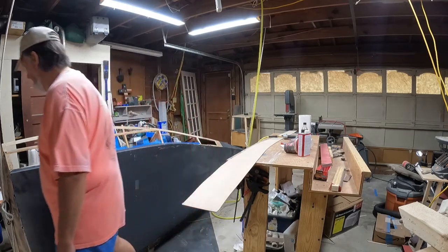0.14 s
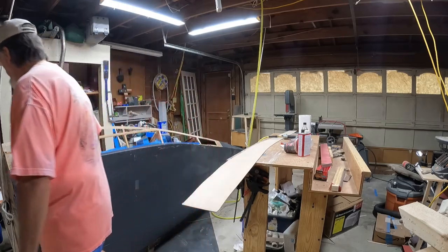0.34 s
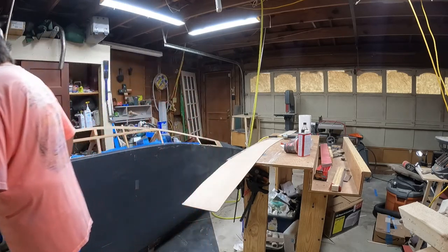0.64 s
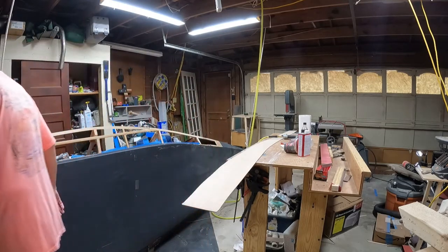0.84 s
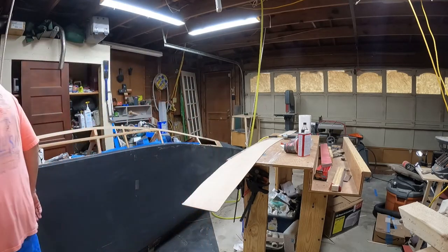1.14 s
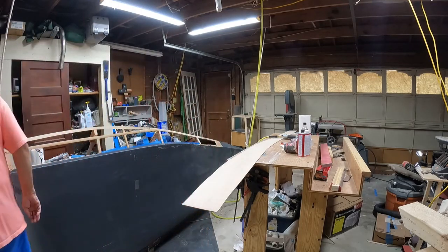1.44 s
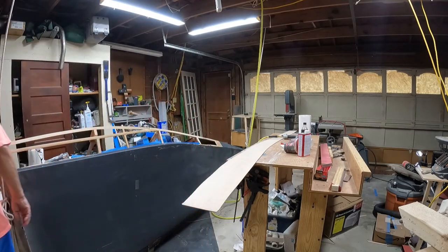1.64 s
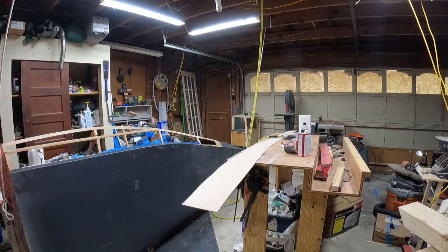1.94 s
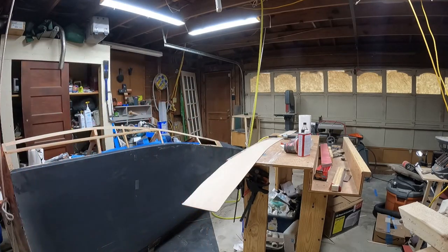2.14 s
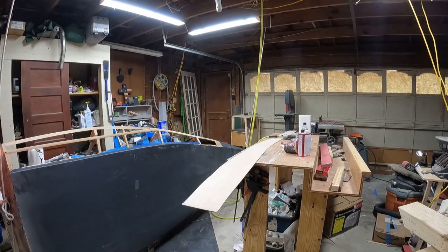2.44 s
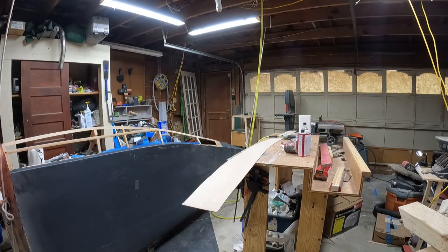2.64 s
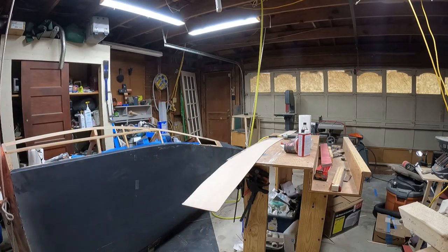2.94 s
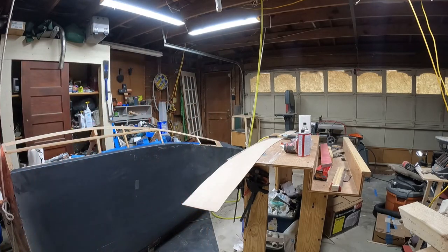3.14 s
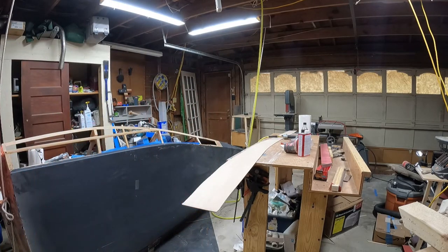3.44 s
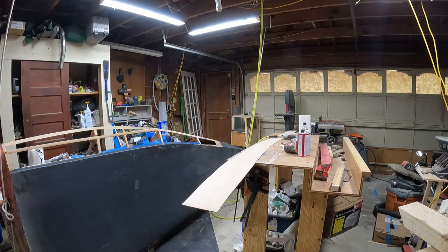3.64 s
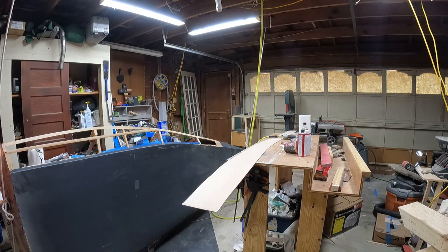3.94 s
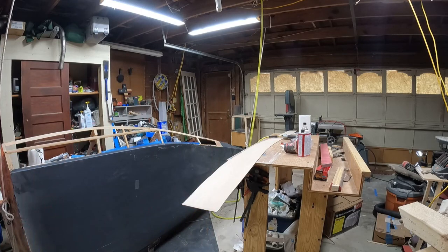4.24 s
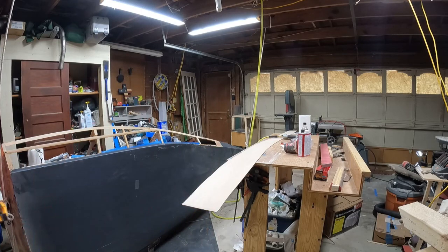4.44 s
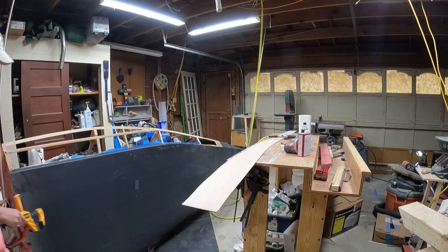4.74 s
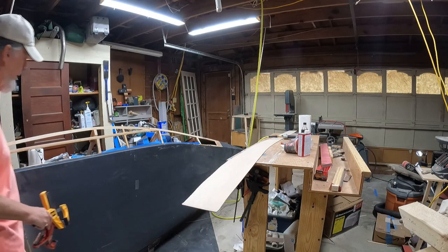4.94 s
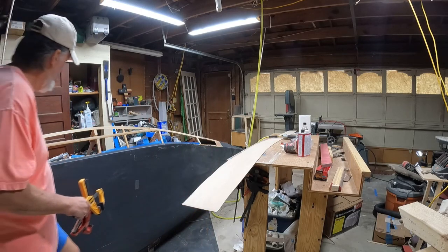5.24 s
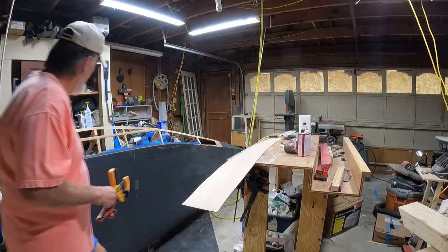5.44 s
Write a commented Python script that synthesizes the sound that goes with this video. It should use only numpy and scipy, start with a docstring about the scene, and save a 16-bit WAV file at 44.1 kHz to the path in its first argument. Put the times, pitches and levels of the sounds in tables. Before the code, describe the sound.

Someone shuffles about off to the side, shoes gritting on concrete above a low wavering hum and rumble. Around the middle, a drawer rolls out in short dull judders and bangs at its stop, tools rattling and ringing briefly. After quieter scuffing it is pushed back, thumps and clicks closed with a tiny high ping. More faint scuffs end the scene. Stereo pickup in a room with about half a second of ring.

```python
"""A garage workshop where a machine hums low in beating tones over rumble and faint air hiss.
Gritty grains under swelling strokes make soles shuffle over the concrete floor. Juddering strokes roll
a drawer open; at its stop, blows of chattering noise set the tools in it ringing. The drawer rolls shut,
its catch pings, and the shuffling returns. Small ticks, rattles and bumps are struck resonances.
Filtered noise tails give the cluttered room its ring of about half a second."""
import sys
import numpy as np
from scipy import signal
from scipy.fft import rfft, irfft
from scipy.io import wavfile
from scipy.ndimage import uniform_filter1d

SR = 44100
rng = np.random.default_rng(int(sys.argv[2]) if len(sys.argv) > 2 else 0)


def generate_wav(sig):
    """Save sig (samples, or channels by samples) to the path in sys.argv[1] as 16-bit PCM at SR."""
    pcm = np.round(np.clip(np.atleast_2d(sig).T, -1, 1) * 32767).astype(np.int16)
    wavfile.write(sys.argv[1], SR, pcm)


N = 246556
T = np.arange(N) / SR


def clatter(crack_db=-14.5, ring_db=-33, crack_t60=0.067, direct_db=-5, rise_s=0.00084, jostle_hz=4):
    """The drawer stops and its tools pile into each other: each blow chatters and feeds their ringing."""
    # tools hitting the drawer and each other: t/s, relative level/dB, dull above f/Hz
    blows = [(3.010, -2, 6940), (3.022, 3, 6000), (3.030, -0.5, 5980), (3.046, -1.5, 6000),
             (3.055, 3, 6970), (3.073, -1.5, 3000), (3.087, -9.5, 2210), (3.101, 6.5, 1640),
             (3.115, -1, 1298), (3.237, -18.5, 1200)]
    # what the loaded drawer rings with: f/Hz, relative level/dB, t60/s
    tool_modes = [(872, -6, .42), (1005, -4, .36), (1055, -7, .42), (1109, -5, .38), (1262, -4, .31),
                  (1296, -3, .36), (1412, -1, .38), (1541, -6, .4), (1828, -1, .36), (1866, -6, .3),
                  (1948, -2, .3), (2124, -6, .26), (2225, -4, .22), (2384, -3, .3), (2509, -2, .25),
                  (2900, -7, .26)]
    # colour of the contact noise: f/Hz, relative level per Hz/dB
    crack_colour = [(30, -48.5), (95, -12.5), (280, -9.5), (520, -9.5), (760, -7), (1050, 1), (1700, -0.5),
                    (2600, -0.5), (3800, -4), (5500, -9), (7500, -10.5), (9500, -21.5), (12000, -24),
                    (15000, -33.5)]

    cracks, rings = np.zeros(N), np.zeros((2, N))
    for s, db, dull_hz in blows:
        soft = signal.butter(1, min(dull_hz, 0.45 * SR), fs=SR)
        rise = 1 - np.exp(-T[:SR] / rise_s)
        chatter = grains(5000, 2.7)[:SR] * fade(crack_t60) * rise
        add(cracks, s, undb(db + crack_db) * signal.lfilter(*soft, chatter))

    for hz, db, t60 in tool_modes:
        # blows at unrelated phases add up in energy; dull ones feed the high modes less
        energy = np.zeros(N)
        for s, blow_db, dull_hz in blows:
            dulling = 1 + (hz / dull_hz) ** 2
            add(energy, s, (undb(blow_db) * fade(t60)) ** 2 / dulling)
        swing = undb(db + ring_db) * uniform_filter1d(np.sqrt(energy), size=130)
        # the jostling tools detune it slightly, and it reaches each microphone in its own phase
        phase = 2 * np.pi * np.cumsum(hz + jostle_hz * walk(60)) / SR
        mid = np.sin(phase)
        side = rng.choice([-1, 1]) * 0.7 * np.cos(phase)
        rings += swing * np.array([mid, side])

    cracks = colour(cracks, crack_colour)
    return room(cracks * undb(direct_db), cracks) + stereo(*rings)


def drawer(runner_db=-4, harden=0.7, wet_db=-1):
    """Rollers judder along their track and shake the box; harder pushes bring up the runners' rattle."""
    # pulls and pushes: start t/s, time to the peak/s, peak drive level/dB, swell from start to peak/dB
    pushes = [(2.655, 0.014, -49, 2), (2.71, 0.063, -53.5, -0.5), (2.78, .06, -40.5, 7),
              (2.89, .06, -43.5, -5), (3.898, 0.033, -48.5, 4), (4.11, 0.05, -51.5, 13),
              (4.245, 0.022, -51, 11), (4.365, 0.05, -40, 5)]
    # colour of the drawer box: f/Hz, relative level per Hz/dB
    box_colour = [(30, -34), (60, -26), (95, 4.5), (160, 2), (230, -2.5), (330, -1), (430, -12.5),
                  (600, -29), (1200, -36.5), (3000, -58.5)]
    # colour of its runners: f/Hz, relative level per Hz/dB
    runner_colour = [(300, -4.5), (600, 2.5), (750, -17), (950, -1), (1300, -8.5), (2200, -10), (3100, -7),
                     (3800, -18), (7000, -24.5), (12000, -77.5)]

    push = strokes(pushes, release_db_per_s=350)
    box = colour(push * grains(1500, 1.4), box_colour)
    hard_push = push * (push / push.max()) ** harden
    runners = colour(hard_push * grains(1800, 1.2), runner_colour) * undb(runner_db)
    rolling = box + runners
    return room(0.72 * rolling, rolling * undb(wet_db))


def shuffles(wet_db=-7, grains_per_s=12000, spread_db=2, heavy_db=-8):
    """Soles grind over grit that crackles differently at each microphone; hard scuffs gain a lower band."""
    # soles dragging on the floor: start t/s, time to the peak/s, peak level/dB, swell from start to peak/dB
    scuffs = [(0.035, 0.012, -64.5, -12), (0.11, .05, -59.5, 10), (0.265, 0.066, -56.5, 14),
              (0.41, 0.038, -59.5, 13), (0.792, 0.035, -45, 6), (0.9, 0.054, -64, 5),
              (1.04, 0.025, -56, 11), (1.11, 0.082, -55, 17), (1.541, 0.021, -44, 6), (1.866, 0.15, -50, 6),
              (2.025, 0.04, -46.5, 9), (2.205, .078, -35, 14), (3.44, 0.055, -47.5, 4),
              (3.55, 0.038, -48, 10.5), (4.1, 0.081, -56.5, 9), (4.21, 0.058, -43, 12.5),
              (4.742, 0.028, -48.5, 1), (4.84, 0.05, -50.5, 16), (5.04, 0.03, -55, 9)]
    # faint gritty rustle of moving about between the scuffs: t/s, level/dB
    rustle = [(0, -64), (.6, -66), (.7, -73), (.8, -61), (1.0, -64.5), (1.36, -69), (1.5, -62), (1.72, -67),
              (1.85, -61), (2.17, -76), (2.5, -67), (2.68, -78.5), (3.85, -75.5), (4.05, -63),
              (4.42, -73.5), (4.7, -58), (5.2, -67), (5.59, -61)]
    # colour of the grit under a sole: f/Hz, relative level per Hz/dB
    grit_colour = [(300, -28), (600, -32.5), (820, -40.5), (1050, -0.5), (1400, 1), (2200, 0.5),
                   (4200, -0.5), (7000, -4.5), (9500, -14), (12000, -19.5), (15000, -26)]

    drag = strokes(scuffs, release_db_per_s=276) + envelope(rustle)
    mid, side = (colour(drag * grains(grains_per_s, spread_db), grit_colour) for _ in range(2))
    sole_band = signal.butter(2, [550, 1800], "band", fs=SR, output="sos")
    sole = unit(signal.sosfilt(sole_band, grains(grains_per_s, spread_db)))
    hard_drag = drag ** 2 / drag.max()
    mid = mid + sole * hard_drag * undb(heavy_db)
    return room(mid, mid * undb(wet_db)) + stereo(np.zeros(N), 0.75 * side)


def taps(catch_s=4.443, catch_db=-50.0, tick_db=16, rattle_db=-1.0, soft_hz=9000):
    """Small knocks: a sharp contact and brief noise through one broad resonance; the catch snaps and pings."""
    # sharp little contacts: t/s, relative level/dB, centre f/Hz
    ticks = [(0.044, -51, 4570), (.965, -53, 8750), (1.1826, -36, 1520), (1.1835, -39.5, 5100),
             (1.1858, -36.5, 1210), (1.775, -45.5, 2480), (1.798, -41.5, 2070), (1.865, -40, 3500),
             (3.439, -38, 3200), (3.666, -46.5, 3560), (4.097, -51.5, 4450), (4.443, -38, 5400),
             (5.268, -51.5, 4940), (5.566, -42.5, 2600)]
    # brief rattles and scrapes: t/s, relative level/dB, centre f/Hz
    rattles = [(.14, -51.5, 1560), (.313, -50, 1730), (.797, -45, 1930), (1.83, -53, 1970),
               (1.848, -47.5, 2120), (2.812, -53, 4500), (2.893, -47.5, 2800), (2.896, -38, 660),
               (3.112, -24.5, 600), (3.215, -31.5, 3730), (3.477, -39, 1920), (3.609, -46.5, 1380),
               (3.9, -61, 2506), (4.367, -47, 1900), (4.41, -41.5, 520), (4.885, -45.5, 2000)]
    # dull bumps of wood: t/s, relative level/dB, centre f/Hz
    bumps = [(1.186, -42.5, 368), (2.662, -49, 282), (2.852, -33.5, 320), (2.933, -28.5, 297),
             (3.925, -47.5, 324), (4.144, -47, 287), (4.372, -34, 93.8), (4.42, -43, 346)]
    # what each kind shares: width/octaves, t60/s, room send before its final doubling/dB
    tick_kind = (0.62, 0.018, -9)
    rattle_kind = (0.75, 0.056, -3)
    bump_kind = (0.47, 0.035, -5)
    # what the catch rings with: f/Hz, relative level/dB, t60/s
    catch_modes = [(5329, -2, .05), (5540, -1, .07), (5650, -2, .1), (5760, -2, .09), (5850, 0, .1),
                   (6020, -3, .08)]

    direct, send = np.zeros(N), np.zeros(N)
    hz = np.geomspace(30, 20000, 40)
    softness = 10 * np.log10(1 + (hz / soft_hz) ** 4)
    for rows, kind in ((ticks, tick_kind), (rattles, rattle_kind), (bumps, bump_kind)):
        octaves, t60, wet_db = kind
        for s, db, centre_hz in rows:
            offset = np.log2(hz / centre_hz) / octaves
            body = -40 * np.log10(1 + offset ** 2 / 2) - softness
            force = undb(rattle_db) * rng.standard_normal(SR) * fade(t60)
            force[0] = undb(tick_db)  # the sharp contact
            knock = undb(db) * colour(force, np.column_stack([hz, body]))
            add(direct, s, knock)
            add(send, s, knock * undb(wet_db))

    ping = undb(catch_db) * ring(catch_modes)
    add(direct, catch_s, ping)
    add(send, catch_s, ping / 2)
    return room(direct, 2 * send)


def machine(hum_hz=128.6, in_step_s=2.11, drift_hz=0.478, rumble_db=-52, boom_hz=77, boom_width_hz=12):
    """Two close tones beat over weaker wavering ones, a low rumble and a boom that swells and sinks back."""
    # main tone: t/s, level/dB
    hum = [(0.2, -35), (0.6, -48.1), (1.0, -43), (1.5, -52), (2.0, -43.5), (2.6, -55), (3.4, -45),
           (4.2, -40), (4.9, -43), (5.6, -39)]
    # a second tone a few Hz higher that beats against it: t/s, level/dB
    hum_partner = [(0.0, -51), (1.1, -46), (1.8, -56.5), (2.3, -50), (3.2, -53.5), (4.0, -64), (4.7, -43.5),
                   (5.6, -56)]
    # how far the second tone lies above the first: t/s, offset f/Hz
    beat = [(0.0, 5.63), (0.55, 2.68), (1.1, 3.82), (1.8, 4.02), (2.4, 2.74), (3.0, 3.62), (3.7, 2.17),
            (4.4, 3.9), (5.0, 2.9), (5.59, 4.07)]
    # weaker tones: f/Hz, level/dB, waver/dB (random in both directions)
    hum_lines = [(53.8, -55, 4), (76.7, -78.5, -8.5), (159.3, -62.5, -0.5)]
    # a deep boom under the hum: t/s, level/dB
    boom_level = [(3.6, -64.5), (3.95, -53), (4.15, -41.5), (4.42, -49.5), (4.6, -52), (5.59, -48)]
    # colour of the rumble: f/Hz, relative level per Hz/dB
    rumble_colour = [(20, -26), (35, 8), (55, 11), (90, 2.5), (150, -2.5), (220, -4), (400, -46)]

    def turn(hz):
        """Phase of a slightly drifting tone."""
        return 2 * np.pi * np.cumsum(hz + drift_hz * walk(3.84)) / SR

    def tone(hz):
        """Drifting sine of rms 1."""
        return np.sqrt(2) * np.sin(turn(hz))

    phase = turn(hum_hz)
    lead = 2 * np.pi * np.cumsum(np.interp(T, *np.transpose(beat))) / SR
    lead = lead - np.interp(in_step_s, T, lead)  # both tones are in step at this time
    first = envelope(hum) * np.sin(phase)
    second = envelope(hum_partner) * np.sin(phase + lead)
    main = np.sqrt(2) * (first + second)
    rest = sum(tone(hz) * undb(db + waver_db * walk(6.7)) for hz, db, waver_db in hum_lines)
    boom = tone(boom_hz + boom_width_hz / 2 * walk(15)) * envelope(boom_level)
    rumble = undb(rumble_db) * colour(rng.standard_normal(N), rumble_colour)
    return main + rest + boom + rumble


def air(level_db=-64):
    """Still air in the room: faint steady hiss from two independent coloured noises."""
    # colour of the hiss: f/Hz, relative level per Hz/dB
    air_colour = [(100, 13), (300, 10), (500, 1.5), (830, -5), (1200, 3), (1800, -7.5), (2600, -18.5),
                  (4500, -12.5), (6800, -9), (9000, -22), (12000, -29), (14000, -38.5), (16000, -62.5)]
    mid, side = (colour(rng.standard_normal(N), air_colour) for _ in range(2))
    return undb(level_db) * stereo(mid, side, width=1.0, left_db=-14)


def room(direct, send):
    """Dense reflections from walls and clutter, dying fastest in the treble."""
    # reverberation: f/Hz, t60/s
    room_t60 = [(100, 0.76), (500, 0.37), (2000, 0.43), (6000, 0.32), (14000, 0.21)]
    hz, s, cells = signal.stft(rng.standard_normal((2, SR)), SR, nperseg=256)
    decay = np.exp(-np.log(1000) * s / on_log(room_t60, hz)[:, None])
    tails = signal.istft(cells * decay, SR)[1][:, :SR]
    tails = tails * np.minimum(T[:SR] / 0.0018, 1)  # reflections build up over 1.8 ms
    mid, side = (signal.fftconvolve(send, tail / np.linalg.norm(tail))[:N] for tail in tails)
    return stereo(direct + mid, side)


def stereo(mid, side, width=0.52, left_db=4.0):
    """Two close microphones: alike in the bass, wider and leaning to one side above it."""
    def upper(x, hz):
        """Gentle high-pass."""
        return signal.sosfilt(signal.butter(1, hz, "high", fs=SR, output="sos"), x)

    lean = (undb(left_db) - 1) / (undb(left_db) + 1)
    difference = upper(lean * mid, hz=480) + upper(width * side, hz=980)
    return mid + np.array([[1], [-1]]) * difference


def strokes(rows, release_db_per_s, attack_s=0.005):
    """Gain of rubbing strokes: each takes hold fast, moves to its peak level and dies away."""
    gain = 0
    for s, length, db, swell_db in rows:
        to_peak = np.clip(1 - (T - s) / length, 0, 1)
        release_db = release_db_per_s * np.maximum(T - s - length, 0)
        gain = gain + (T >= s) * undb(db - swell_db * to_peak - release_db)
    smooth = uniform_filter1d(gain, size=max(int(attack_s * SR), 1))
    return np.abs(smooth)


def grains(per_s, spread_db):
    """Dense tiny clicks of uneven size, at rms 1."""
    hit = rng.random(N) < per_s / SR
    size_db = spread_db * np.clip(rng.standard_normal(N), -2, 2)
    return unit(hit * rng.standard_normal(N) * undb(size_db))


def ring(modes):
    """Decaying modes, neighbours swinging in opposite directions."""
    total = 0
    for k, (hz, db, t60) in enumerate(modes):
        total = total + (-1) ** k * undb(db) * fade(t60) * np.sin(2 * np.pi * hz * T[:SR])
    return total


def fade(t60):
    """One second of exponential decay."""
    return np.exp(-np.log(1000) * T[:SR] / t60)


def walk(rate):
    """Smooth random wander of rms 1, drawn anew at the given rate in Hz."""
    k = int(SR / rate)
    steps = np.repeat(rng.standard_normal(N // k + 1), k)
    return unit(uniform_filter1d(uniform_filter1d(steps, k), k)[:N])


def envelope(rows):
    """Gain that follows a (t/s, level/dB) curve."""
    return undb(np.interp(T, *np.transpose(rows)))


def colour(x, points):
    """Causal minimum-phase filter with the given (f/Hz, dB) spectrum and unit power gain."""
    size = 8192
    gain = unit(undb(on_log(points, np.fft.rfftfreq(size, 1 / SR))))
    # folding the cepstrum onto positive times gives the minimum phase
    cepstrum = irfft(np.log(gain))
    cepstrum[1:size // 2] *= 2
    cepstrum[size // 2 + 1:] = 0
    impulse = irfft(np.exp(rfft(cepstrum)))
    return signal.fftconvolve(x, impulse)[:len(x)]


def on_log(points, hz):
    """Read (f/Hz, value) points on a log-frequency axis."""
    f, value = np.transpose(points)
    return np.interp(np.log(hz + 1), np.log(f), value)


def add(track, s, sound):
    """Mix a sound in at time s."""
    i = int(s * SR)
    track[i:i + len(sound)] += sound[:N - i]


def undb(db):
    """Decibels to gain."""
    return 10 ** (np.asarray(db) / 20)


def unit(x):
    """Scale to rms 1."""
    return x / np.sqrt(np.mean(x ** 2))


def scene():
    """All sources in the room."""
    return clatter() + drawer() + shuffles() + taps() + machine() + air()


def record(dry, soft_hz=14000, top_hz=15300):
    """Roll off the treble, then cut the top steeply."""
    soft = signal.sosfilt(signal.butter(4, soft_hz, fs=SR, output="sos"), dry)
    return signal.sosfilt(signal.ellip(8, 0.2, 70, top_hz, fs=SR, output="sos"), soft)


dry = scene()
out = record(dry)
generate_wav(out)
```